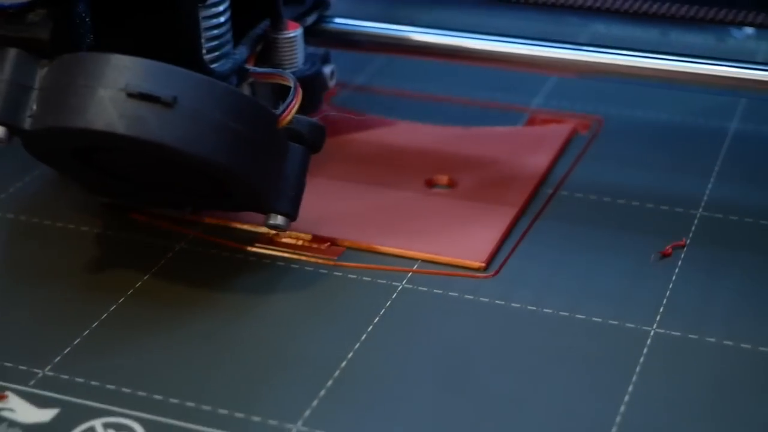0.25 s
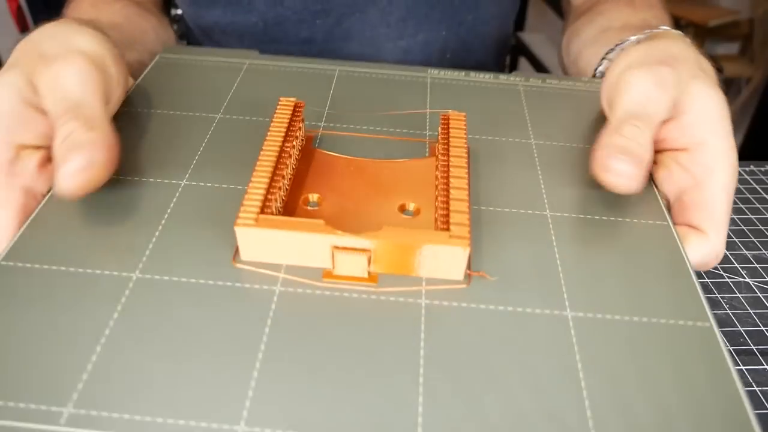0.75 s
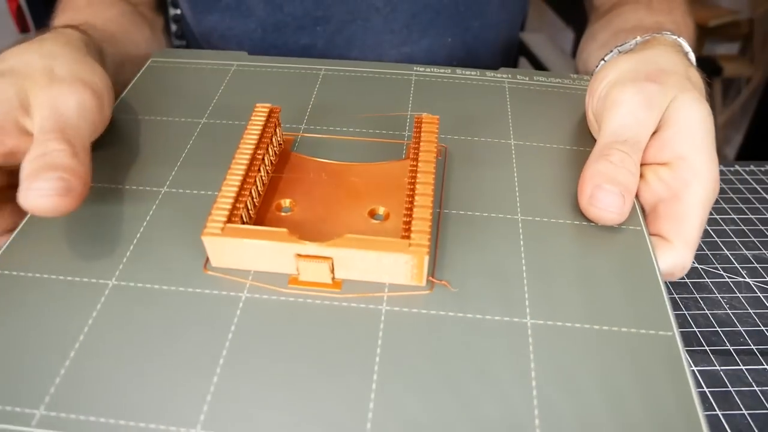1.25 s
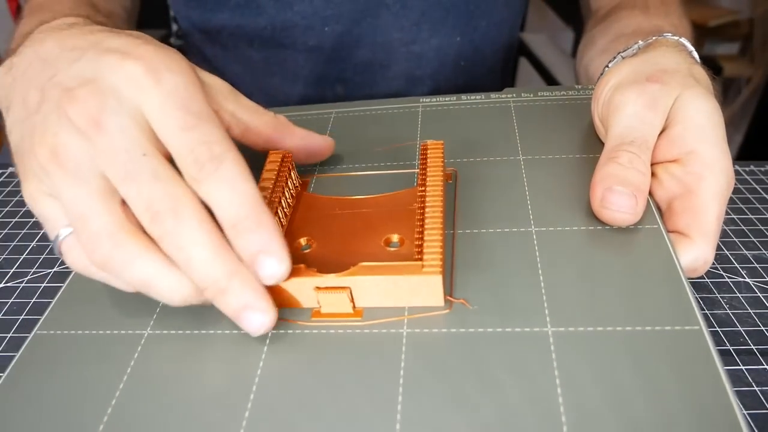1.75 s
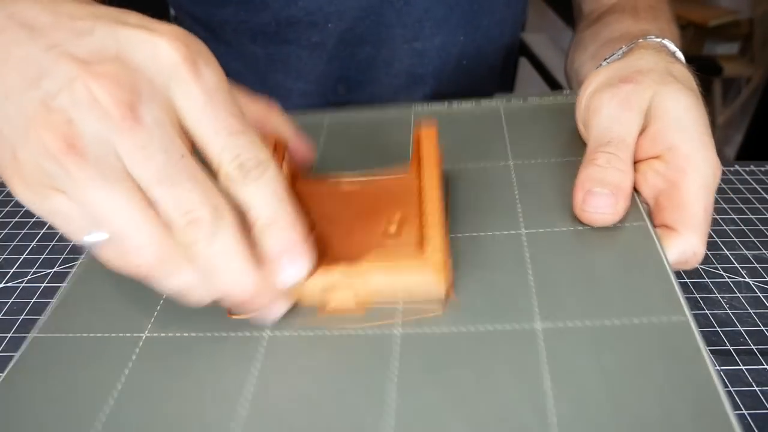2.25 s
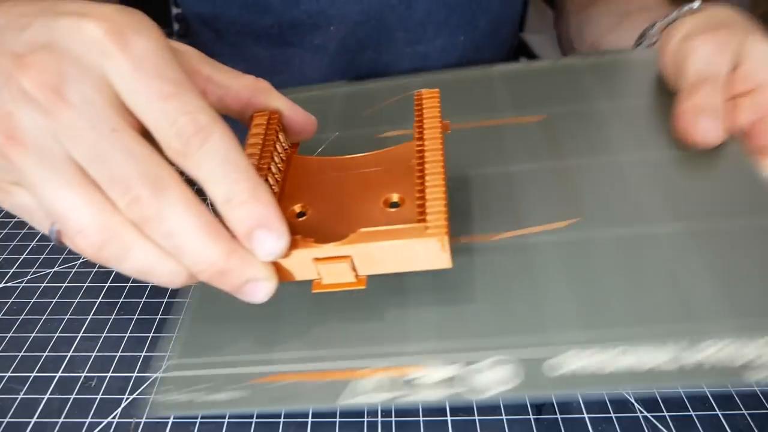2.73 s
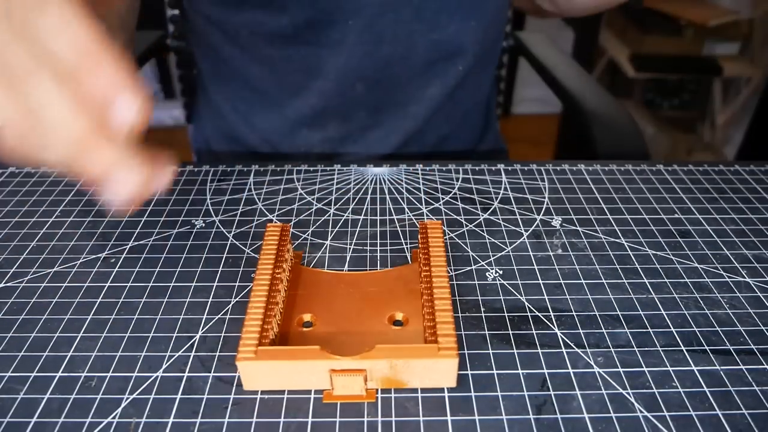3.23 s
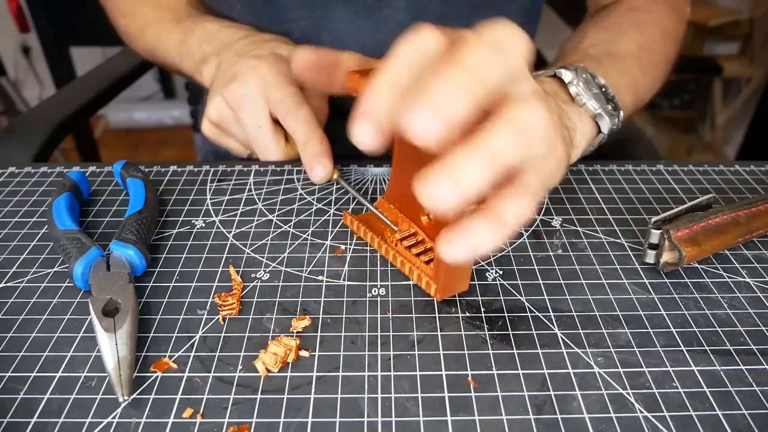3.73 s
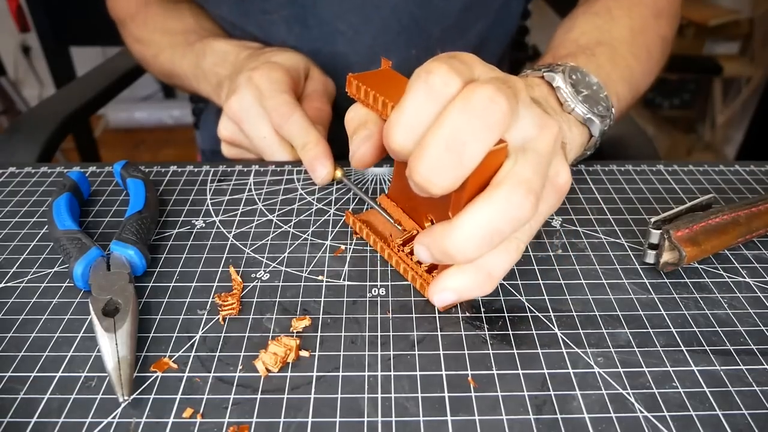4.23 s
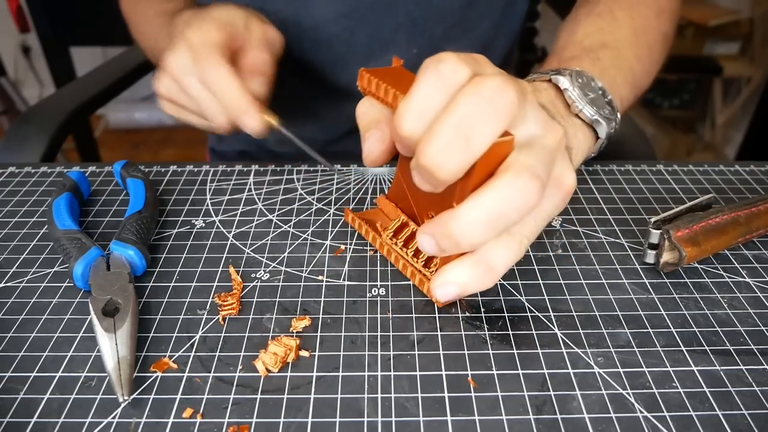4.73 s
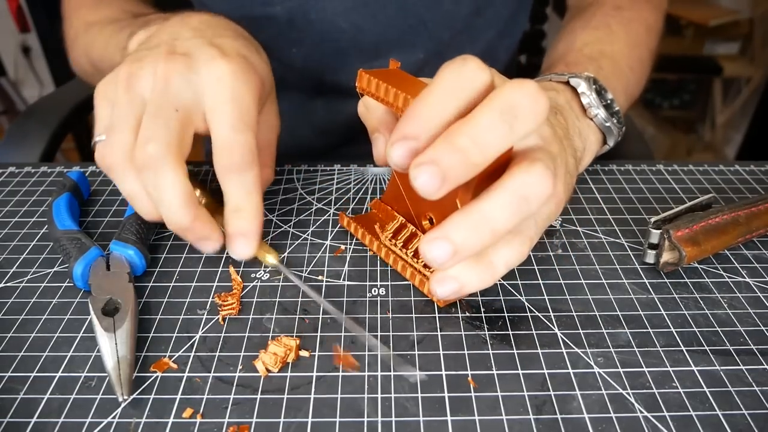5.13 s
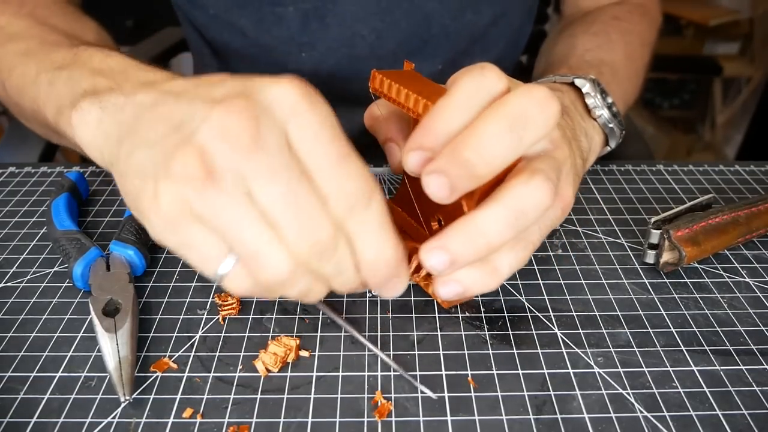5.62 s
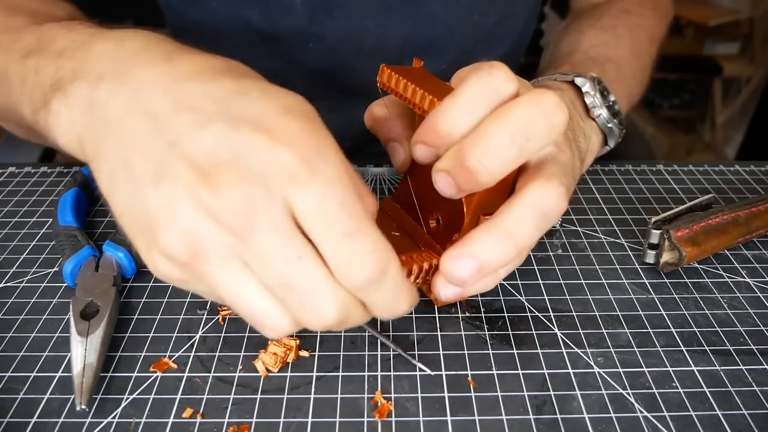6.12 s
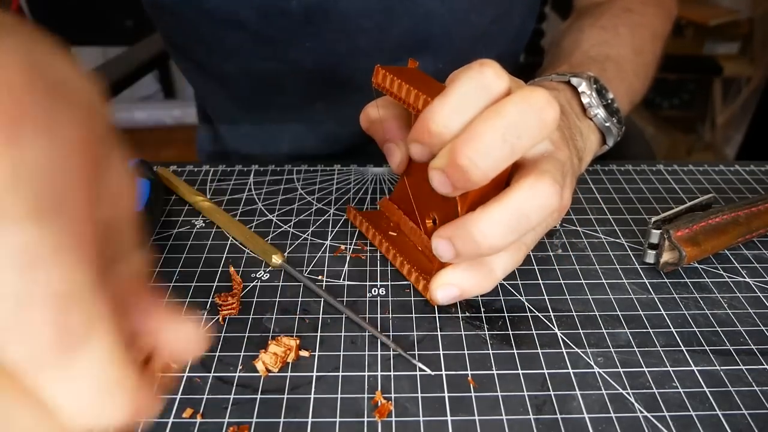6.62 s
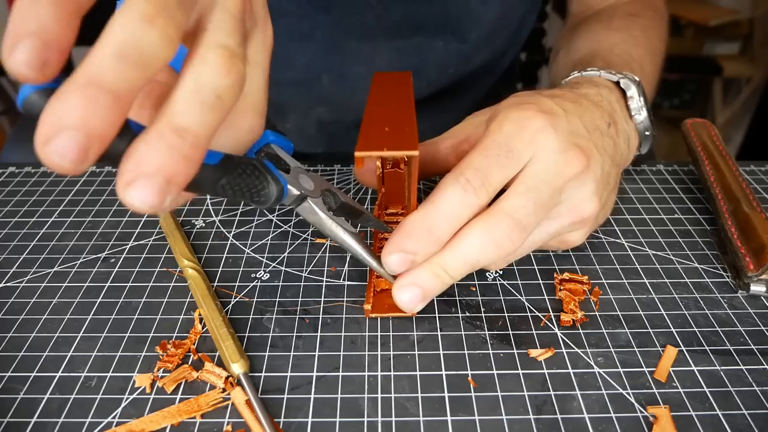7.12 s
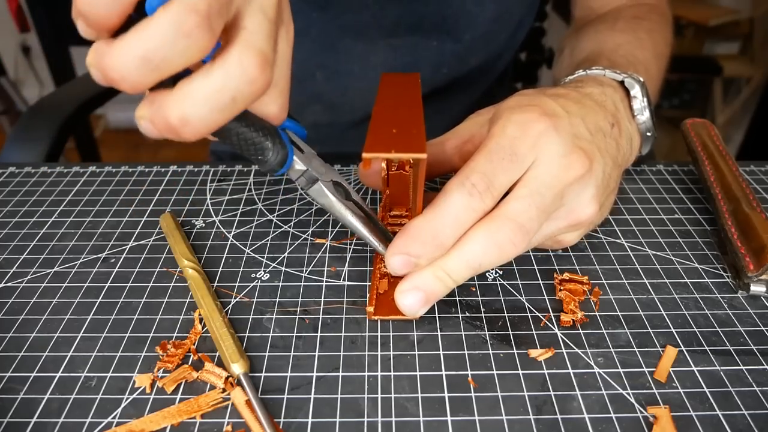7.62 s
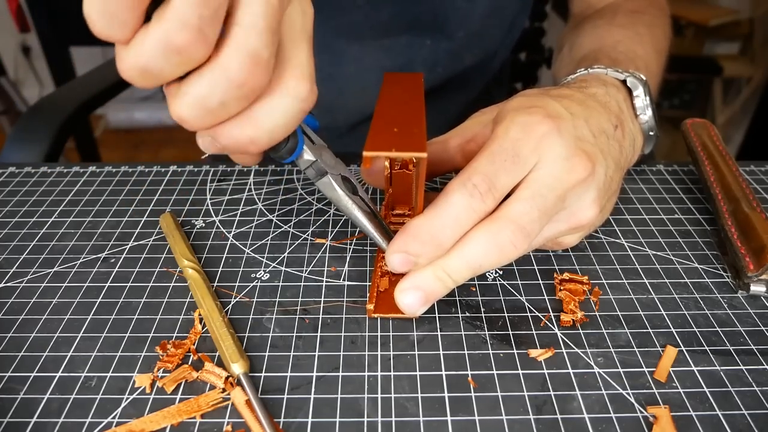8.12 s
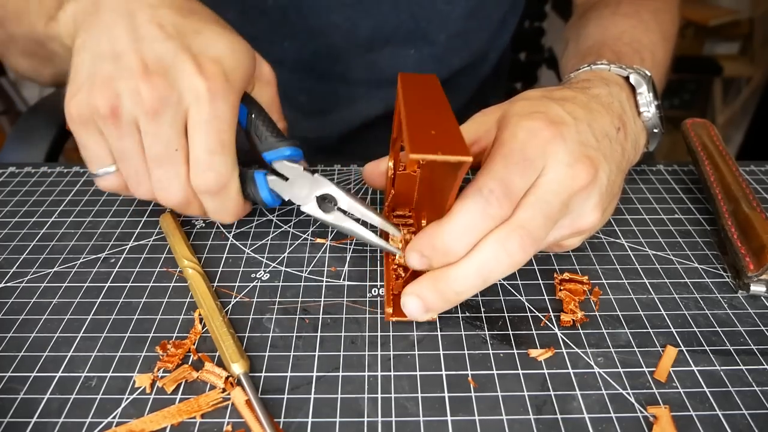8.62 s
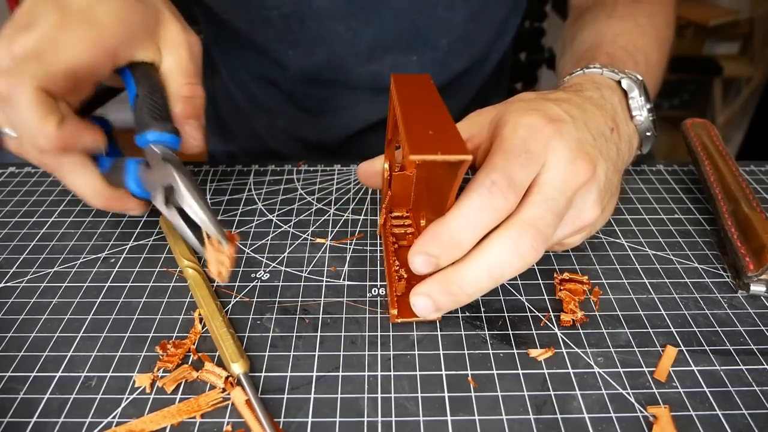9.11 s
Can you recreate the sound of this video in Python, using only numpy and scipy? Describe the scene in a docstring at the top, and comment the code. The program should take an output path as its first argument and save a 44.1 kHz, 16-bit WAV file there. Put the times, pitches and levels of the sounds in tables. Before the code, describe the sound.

A 3D printer's wavering motor tones and fan rush stop abruptly. In a small hard room, a plastic part cracks off a flexed steel sheet, the sheet swishes away and the part clacks onto a cutting mat. A thin pick snaps supports in bright clusters, a tool knocks loudly on the table, fingernails flick bits off, then pliers crunch and tear out more. One close microphone.

```python
"""A 3D printer hums for a moment. Then, at a work table in a small hard room, a plastic part cracks
loose from its flexed steel sheet and is set down. Its supports are broken out with a thin metal pick,
the fingers and pliers, heard by one microphone close by. Motors are wavering tones over fan noise;
cracks, snaps and knocks are short noise bursts ringing a body; rubbing is a swell of tiny slips."""
import sys
import numpy as np
from scipy import signal
from scipy.fft import rfft, irfft
from scipy.io import wavfile
from scipy.ndimage import uniform_filter1d

SR = 44100
rng = np.random.default_rng(int(sys.argv[2]) if len(sys.argv) > 2 else 0)


def store_wav(level_fs):
    """Save 16-bit WAV to argv[1]."""
    pcm = np.round(np.clip(np.atleast_2d(level_fs), -1, 1) * 32767)
    wavfile.write(sys.argv[1], SR, pcm.T.astype(np.int16))


N = 412776  # length of the scene in samples
TAPS = 8192  # length of one short sound in samples
PRINTER_END = .393  # seconds


def amp(db):
    """Turns decibels into a plain factor."""
    return 10 ** (np.asarray(db) / 20)


def evened(x):
    """Brings a sound to an rms of 1."""
    return x / np.sqrt(np.mean(x ** 2) + 1e-20)


def read(points, hz):
    """Reads a curve of (Hz, value) points, with pitch on a log scale."""
    f, value = np.transpose(points)
    return np.interp(np.log(hz + 1), np.log(f + 1), value)


def add(mix, s, sound):
    """Adds a sound to the mix, starting at s seconds."""
    part = mix[max(round(s * SR), 0):][:len(sound)]
    part += sound[:len(part)]


def bins(size):
    """The frequencies in Hz of a spectrum."""
    return np.fft.rfftfreq(size, 1 / SR)


def coloured(x, colour):
    """Filters a sound by a (Hz, dB) curve and brings it to rms 1."""
    return evened(irfft(rfft(x) * amp(read(colour, bins(len(x)))), len(x)))


def drift(edge_hz):
    """A random curve of rms 1 that moves little faster than edge_hz."""
    noise = rfft(rng.standard_normal(N))
    return evened(irfft(noise * np.exp(-(bins(N) / edge_hz) ** 2), N))


def causal(gain):
    """The spectrum of a response with this gain that starts at once and then rings out."""
    log_gain = np.log(np.maximum(gain, 1e-5))
    circle = np.concatenate([log_gain, log_gain[-2:0:-1]])
    return np.exp(np.conj(signal.hilbert(circle)))[:len(gain)]


def below(hz, edge_hz):
    """A soft step: near 1 under the edge, near 0 over it."""
    return 1 / (1 + (hz / edge_hz) ** 6)


def peak(hz, centre_hz, width_hz, db):
    """The gain that one resonance adds."""
    return (amp(db) - 1) / (1 + (2 * (hz - centre_hz) / width_hz) ** 2)


def glide(hz):
    """A sine that follows a pitch curve in Hz."""
    return np.sin(2 * np.pi * np.cumsum(hz) / SR)


# The printer's motor tones. Each row: pitch in Hz, level in dB.
MOTOR_TONES = [(177.6, -61.5), (213, -65), (240, -63), (291, -72), (350, -62), (507, -61.5), (524, -58),
               (2912, -71)]
# The rush of its fans. Each row: pitch in Hz, strength in dB.
FAN_COLOUR = [(60, -21), (130, -13.5), (240, -13), (330, -19), (420, -14), (520, -5), (680, -13),
              (1100, -11.5), (1500, -23), (2600, -16.5), (4500, -23.5), (10000, -39), (16000, -60)]
# The high sizzle of the motor drivers. Each row: time in seconds, centre in Hz, level in dB.
SIZZLE = [(0, 13300, -56), (.22, 13400, -57), (.26, 14600, -56), (.3, 16300, -64), (.36, 16300, -69),
          (.39, 15200, -60)]


def printer(fan_db=-54, flat_noise_db=-62, waver=0.0076, throb_db=3.5, sizzle_width_hz=2200):
    """Stepper tones waver over fan noise, with a band of driver sizzle whose centre moves."""
    t = np.arange(N) / SR
    hum = np.zeros(N)
    for hz, db in MOTOR_TONES:
        throb = amp(db + throb_db * drift(8.2))
        hum += throb * evened(glide(hz * (1 + waver * drift(26))))
    s, centre_hz, level_db = np.transpose(SIZZLE)
    turn = 2 * np.pi * np.cumsum(np.interp(t, s, centre_hz)) / SR
    # slow noise on a sine and a cosine makes a band of noise around the centre
    sizzle = evened(drift(sizzle_width_hz) * np.cos(turn) + drift(sizzle_width_hz) * np.sin(turn))
    sizzle *= amp(np.interp(t, s, level_db))
    fans = amp(fan_db) * coloured(rng.standard_normal(N), FAN_COLOUR)
    fans += amp(flat_noise_db) * rng.standard_normal(N)
    return (hum + sizzle + fans) * (t < PRINTER_END)


# The colour of the room's low background noise. Each row: pitch in Hz, strength in dB.
FLOOR_COLOUR = [(15, -47.5), (25, -20), (127, 2), (285, -6), (394, -4), (476, -9.5), (624, -10),
                (1370, -14.5), (2610, -23.5), (4740, -21), (8360, -26.5), (14800, -38), (16000, -37.5)]
# Its loudness over time. Each row: time in seconds, level in dB.
FLOOR_LEVEL = [(0, -63.5), (3.402, -67.5), (3.6, -56), (6.698, -64), (7.599, -62), (9.302, -63.5)]


def floor():
    """The room's background: coloured noise that swells by over 10 dB near 3.5 s, then sinks."""
    s, db = np.transpose(FLOOR_LEVEL)
    level = amp(np.interp(np.arange(N) / SR, s, db))
    return level * coloured(rng.standard_normal(N), FLOOR_COLOUR)


# One motor slows down as the head ends a stroke. Each row: time in seconds, pitch in Hz, level in dB.
MOTOR_SLOWING = [(.22, 305, -82), (.27, 289.4, -47), (.31, 242.4, -56), (.36, 223.4, -61),
                 (.39, 225, -43.5)]


def slowing_motor():
    """A stepper tone that sinks with the speed of the head."""
    t = np.arange(N) / SR
    s, hz, db = np.transpose(MOTOR_SLOWING)
    tone = evened(glide(np.interp(t, s, hz)))
    return tone * amp(np.interp(t, s, db)) * (t > s[0]) * (t < PRINTER_END)


def blows(rows, colour, modes, db, length_s, strut_db, wet_db, scatter_db=-17,
          strut_width_hz=1100, bounce=0.46):
    """Runs of tiny fractures or contacts ring a body; returns the near sound and what fills the room."""
    near, far, hz, t = np.zeros(N), np.zeros(N), bins(TAPS), np.arange(TAPS) / SR
    ringing = 1 + sum(peak(hz, *mode) for mode in modes)
    small = np.sqrt(1 - below(hz, 130))  # small bodies radiate little bass
    body = amp(read(colour, hz)) * ringing * small
    # the break builds and dies within a few ms; hands and table scatter it a little longer
    envelope = t / length_s * np.exp(1 - t / length_s) + amp(scatter_db) * np.exp(-t / .008)
    fade = np.cos(np.pi / 2 * t / t[-1]) ** 2
    for s, level_db, body_db, sheen_db, strut_hz in rows:
        run = rfft(rng.standard_normal(TAPS) * envelope)
        even = 1 / np.sqrt(uniform_filter1d(abs(run) ** 2, size=90))  # a break excites all pitches about alike
        tilt = amp(body_db * below(hz, 2500) - sheen_db * below(hz, 8100))
        blow = run * causal(even * body * tilt)
        # up close the struck spot rings out, and one bounce off the mat combs the treble
        strut = causal(1.5 + peak(hz, strut_hz, strut_width_hz, strut_db))
        delay_s = rng.uniform(.0004, .0012)
        comb = 1 + bounce * (1 - below(hz, 1200)) * np.exp(-2j * np.pi * hz * delay_s)
        sound = irfft(blow * strut * comb) * fade  # what reaches the microphone first
        # equal energy for equal level, as if spread over 5 ms
        gain = amp(level_db + db) / np.linalg.norm(sound) * np.sqrt(SR / 200)
        add(near, s, gain * sound)
        add(far, s, gain * amp(wet_db) * irfft(blow) * fade)
    return np.array([near, far])


# Levels in the tables of blows, pushes and strokes are relative: db in the function shifts them all.
# Fingers bumping the steel sheet. Each row: start in seconds, level in dB, body under 2.5 kHz in dB.
BUMPS = [(.447, -50, 20), (.6467, -56.5, 22), (1.1413, -55, 20.5), (1.2971, -56, 4), (1.4131, -49, 3),
         (1.5911, -47, 18)]
# The part cracking loose from the flexed sheet. Each row: start in seconds, level in dB,
# body under 2.5 kHz in dB, pitch in Hz at which the struck spot rings.
PEELS = [(0.5067, -51, -14, 7100), (0.887, -31, -1.5, 10780), (0.8886, -28, 8.5, 10830),
         (0.8959, -21, -8.5, 5900), (0.995, -43.5, -22, 6090), (2.2172, -39.5, -13.5, 8270),
         (2.2342, -22.5, -5, 3730), (2.2587, -31, -6.5, 8380), (2.273, -22, -4, 8150),
         (2.2793, -17.5, 2, 5500), (2.3067, -18.5, 14, 3060)]
# The colour of both. Each row: pitch in Hz, strength in dB.
PEEL_COLOUR = [(100, -4.5), (350, -10.5), (650, 9), (1300, 2.5), (2600, -5), (5500, -0.5), (8000, -3),
               (11000, -7.5), (16000, -25.5)]
# What rings in the sheet. Each row: pitch in Hz, width in Hz, boost above the colour in dB.
SHEET_MODES = [(624, 47, 6.5), (774, 11, 5.5), (966, 30, 5), (1234, 30, 5.5), (1630, 120, -3),
               (3600, 99, 3.5)]


def bumps_and_peels(peel_sheen_db=3.5, bump_sheen_db=-15.5, bump_ring_hz=3940):
    """Bumping fingers and the cracking part both ring the steel; sheen sets the range over 8.1 kHz."""
    rows = [(s, level_db, body_db, peel_sheen_db, ring_hz) for s, level_db, body_db, ring_hz in PEELS]
    rows += [(*bump, bump_sheen_db, bump_ring_hz) for bump in BUMPS]
    return blows(rows, PEEL_COLOUR, SHEET_MODES, db=1.57, length_s=0.00081, strut_db=12.0, wet_db=8.0)


def recoils(hits, db, length_s=0.02):
    """A recoiling hand gives the table a dull push with each hit, in proportion to its strength."""
    return [(s, level_db + db, length_s) for s, level_db, *_ in hits]


# The hands pressing the part onto the table, or the part hitting it. Each row: start in seconds,
# level in dB, fading time in seconds.
THUMPS = [(2.312, -34.5, 0.031), (2.722, -53, 0.023), (3.514, -41, 0.0096), (3.706, -38.5, 0.01),
          (3.825, -43.5, .033), (4.396, -42, 0.071), (4.796, -60, .018), (4.97, -51, 0.031),
          (5.701, -43, 0.012), (6.5, -43.5, 0.029), (7.006, -50, 0.04), (7.56, -42.5, 0.095),
          (8.612, -35.5, 0.022)]
# How the table top answers a push. Each row: pitch in Hz, strength in dB.
THUMP_COLOUR = [(25, -33.5), (52, -17.5), (75, -2.5), (105, -4), (138, 5), (185, -11.5), (225, -3),
                (400, -10), (900, -31.5), (3000, -72)]


def thumps(db=0.5):
    """Pushes, hits and recoils shake the table top: fading noise through its mostly low response."""
    out, t = np.zeros(N), np.arange(TAPS) / SR
    pushes = THUMPS + recoils(BUMPS, db=-9) + recoils(LANDINGS, db=-23) + recoils(PULLS, db=-32)
    top = causal(amp(read(THUMP_COLOUR, bins(TAPS))))
    for s, level_db, length in pushes:
        push = irfft(rfft(rng.standard_normal(TAPS) * np.exp(-t / length)) * top)
        push *= signal.windows.tukey(TAPS, .02)
        add(out, s, amp(level_db + db) * push / np.linalg.norm(push) * np.sqrt(length * SR / 2))
    return out


# Faint thin whistles, one curve each. Each row of a curve: time in seconds, pitch in Hz, level in dB.
WHISTLES = [
    [(1.42, 8600, -82), (1.54, 10500, -77), (1.61, 11200, -74), (1.68, 9300, -82), (1.78, 8350, -74),
     (1.9, 8500, -75), (2.0, 7500, -77)],
    [(1.49, 7650, -70), (1.53, 8300, -64), (1.56, 8200, -70), (1.6, 8700, -67)],
    [(7.71, 6400, -62), (7.81, 6050, -58), (7.89, 6400, -56), (7.98, 5850, -66)],
]


def whistles(waver=0.0046):
    """Faint thin tones that glide and waver."""
    out, t = np.zeros(N), np.arange(N) / SR
    for curve in WHISTLES:
        s, hz, db = np.transpose(curve)
        on = (t > s[0]) & (t < s[-1])
        pitch = np.interp(t[on], s, hz) * (1 + waver * drift(200)[on])
        tone = amp(np.interp(t[on], s, db)) * glide(pitch)
        add(out, s[0], tone * signal.windows.tukey(on.sum(), .2))
    return out


def drags(snaps, delay_s=.014, half_s=.013, db=-23, body_db=-8.5):
    """After each snap the broken edge drags past its stump in a short stroke."""
    return [(s + delay_s, half_s, level_db + db, body_db) for s, level_db, _ in snaps]


# Strokes of plastic dragging over plastic or steel. Each row: time of the peak in seconds,
# half length in seconds, level in dB, body in dB (here under 1.3 kHz).
SCRAPES = [(1.431, 0.014, -55, 35.5), (1.617, 0.037, -67.5, 20), (1.765, .04, -64, 8), (3.721, .13, -58, 0),
           (4.654, .015, -43.5, 3.5), (4.724, .0087, -36.5, -24.5), (4.801, 0.0031, -44.5, 25.5),
           (4.989, .07, -56, 10), (5.596, 0.13, -59.5, 0), (5.924, 0.07, -56.5, 6.5),
           (6.411, 0.042, -58.5, -9.5), (7.798, .19, -65.5, -6), (8.418, .11, -44, -11),
           (8.555, 0.059, -36, -8), (8.837, .025, -56.5, -3), (8.967, 0.022, -43, -3),
           (9.19, 0.17, -68.5, -15)]
# Their colour. Each row: pitch in Hz, strength in dB.
SCRAPE_COLOUR = [(100, -7), (400, 8.5), (750, 5.5), (1600, -7.5), (2700, -12.5), (4800, -8.5), (7500, -5.5),
                 (11000, -11), (16000, -21)]


def scrapes(slips_per_s=2600, spread_db=-1.5, hiss=1.0, db=4.0):
    """A stroke is a swell of small uneven slips over smooth hiss."""
    out, size = np.zeros(N), SR // 2
    t, hz = np.arange(size) / SR - 1 / 4, bins(size)  # the peak lies at t = 0
    for s, half, level_db, body_db in SCRAPES + drags(PICKS + PULLS):
        strength = amp(spread_db * np.minimum(rng.exponential(1, size), 4))
        slips = strength * (rng.random(size) < slips_per_s / SR)
        rub = (evened(slips) + hiss) * rng.standard_normal(size)
        colour = amp(read(SCRAPE_COLOUR, hz) + body_db * below(hz, 1300))
        rub = evened(irfft(rfft(rub) * colour, size))
        add(out, s + t[0], amp(level_db + db) * rub * np.exp(-(t / half) ** 2))
    return out


def swish(s=2.695, half_s=0.065, db=-50.5):
    """The steel sheet slides away over the mat: a smooth swell with a low body and a singing edge."""
    colour = [(100, -18), (700, 4.5), (1600, -2.0), (2700, -9.5), (4500, -4.5), (6500, -10.0),
              (10000, -21), (16000, -40)]  # (Hz, dB)
    swell = np.exp(-((np.arange(N) / SR - s) / half_s) ** 2)
    return amp(db) * coloured(rng.standard_normal(N), colour) * swell


# The part landing on the cutting mat. Each row: start in seconds, level in dB,
# body under 2.5 kHz in dB, sheen over 8.1 kHz in dB, ring in Hz.
LANDINGS = [(3.1425, -15, -4, -1, 5490), (3.1877, -25, 5, -30, 5530.0)]
# The landing's colour. Each row: pitch in Hz, strength in dB.
LANDING_COLOUR = [(100, -13), (380, -15), (600, -9.5), (1500, -4), (2900, -9.5), (5300, -11), (7500, -15),
                  (9500, -16), (16000, -35.5)]
# What rings in the part. Each row: pitch in Hz, width in Hz, boost above the colour in dB.
PART_MODES = [(626, 73, 18), (1346, 110, 5.2), (2180, 84, 5), (3760, 79, 0.8), (5760, 240, 8.7)]


def landings():
    """The part strikes the mat and rings in its own modes."""
    return blows(LANDINGS, LANDING_COLOUR, PART_MODES, db=4.5, length_s=0.0014, scatter_db=-10.5,
                 strut_db=7.5, wet_db=7.5)


def splintered(snaps, body_db, sheen_db, body_per_db, sheen_per_db, count=2,
               firm_db=-24, gap_s=.011, splinter_db=-11, spread_db=4.5):
    """Splinters follow each snap, usually weaker; the force of the snap sets the colour of them all."""
    rows = []
    for (s, level_db, ring_hz), chance in zip(snaps, rng.standard_normal((len(snaps), count, 2))):
        force_db = level_db - firm_db  # against an ordinary snap
        colour = (body_db + body_per_db * force_db, sheen_db + sheen_per_db * force_db, ring_hz)
        rows.append((s, level_db, *colour))
        for late, strong in chance:
            s += gap_s * np.exp(.5 * late)
            level_db += splinter_db
            rows.append((s, level_db + spread_db * strong, *colour))
    return rows


# Thin supports snapping under the pick. Each row: start in seconds, level in dB, ring of the strut in Hz.
PICKS = [(3.5787, -31, 5540), (3.9021, -29, 3700), (3.9611, -18.5, 9300), (3.9817, -23.5, 8700),
         (4.0501, -19.5, 5170), (4.0961, -22.5, 8870), (4.1072, -18, 9830), (4.1126, -15, 8380),
         (4.1227, -22, 8940), (4.1709, -21, 9200), (4.1851, -15, 8800), (4.1978, -25, 8980),
         (4.316, -21, 5460), (4.3307, -18.5, 9000), (4.3912, -14, 8550), (4.3984, -11, 5530),
         (4.4102, -17, 5080), (4.6079, -26, 4140), (4.7258, -30.5, 4370), (5.4032, -34.5, 5210),
         (5.4482, -38.5, 5700), (5.6504, -32.5, 6140)]
# Their colour. Each row: pitch in Hz, strength in dB.
PICK_COLOUR = [(100, -13), (350, -4.5), (700, 2.5), (1400, 2), (2500, -8), (4200, -5.5), (7200, -5.5),
               (9300, -2.5), (11000, -9.5), (13000, -8.5), (16000, -22.5)]
# What rings in the hand-held part, also under fingernails and pliers.
# Each row: pitch in Hz, width in Hz, boost above the colour in dB.
HELD_MODES = [(627, 140, 10.5), (937, 100, 12), (1303, 210, 5), (1920, 730, 4), (2400, 280, -2.5),
              (5054, 540, 2.5), (7790, 120, 3)]


def picks():
    """Thin supports snap under the pick and ring the held part."""
    rows = splintered(PICKS, body_db=-5.0, sheen_db=2.5, body_per_db=-0.16, sheen_per_db=0.15)
    return blows(rows, PICK_COLOUR, HELD_MODES, db=-0.35, length_s=0.00076, strut_db=12.5, wet_db=5.5)


# A lightly touched tool or loose strut rings on. Each row: start in seconds, pitch in Hz, level in dB,
# time in seconds to fall by 60 dB.
PINGS = [(3.638, 1320, -32, 0.045), (4.965, 924, -43.5, 0.35), (4.974, 960, -49, 0.15),
         (4.965, 2980, -46, 0.059), (5.906, 1273, -30, 0.039), (6.795, 3360, -48.5, 0.033)]


def pings():
    """Single modes that die away as plain sines."""
    out, t = np.zeros(N), np.arange(TAPS) / SR
    for s, hz, level_db, t60 in PINGS:
        add(out, s, amp(level_db - 60 * t / t60) * np.sin(2 * np.pi * hz * t))
    return out


# Tools, knuckles and the held part knocking on the table. Each row: start in seconds, level in dB,
# body under 2.5 kHz in dB, sheen over 8.1 kHz in dB, ring in Hz.
KNOCKS = [(3.7094, -37, 19, 9, 5360), (4.5037, -26, -.5, -22, 5020), (5.1502, -11.5, 4.5, -22.5, 3180),
          (5.1553, -6, 36, -6, 6270), (5.7129, -25, -0.5, 3.5, 6050), (5.9057, -36.5, 25, 3, 6600),
          (6.2977, -39, 0, -27, 6070.0), (6.9417, -34, 11.5, -4, 3090), (7.0257, -41.5, 2.5, 5, 6570)]
# Their colour. Each row: pitch in Hz, strength in dB.
KNOCK_COLOUR = [(100, -21.5), (300, -18), (580, -13.5), (1300, -11.5), (2400, -18), (5500, -19.5),
                (8500, -18), (16000, -29)]
# What rings in the table. Each row: pitch in Hz, width in Hz, boost above the colour in dB.
TABLE_MODES = [(470, 49, 4.8), (610, 32, 12.4), (870, 55, 11), (1308, 61, 4)]


def knocks():
    """Tools, knuckles and the held part strike the table and ring its modes."""
    return blows(KNOCKS, KNOCK_COLOUR, TABLE_MODES, db=-4.0, length_s=0.0018, scatter_db=-4.5,
                 strut_db=4.0, wet_db=4.0)


def crumbs(count=12, per_s=16, db=15.5, spread_db=3, ring_hz=5360):
    """Crumbs break off at random moments of each hard, bright stroke; dull rubs shed none."""
    rows = []
    chances = rng.uniform(-1, 1, (len(SCRAPES), count, 3))
    for (s, half, level_db, body_db), chance in zip(SCRAPES, chances):
        for luck, when, strong in chance:
            if body_db < 0 and abs(luck) < per_s * 2 * half / count:
                rows.append((s + half * when, level_db + db + spread_db * strong, body_db / 2, 0, ring_hz))
    return rows


# Loose supports flicked off with the fingernails. Each row: start in seconds, level in dB,
# ring of the strut in Hz.
FLICKS = [(6.106, -34.5, 5720), (6.1558, -40.5, 12140), (6.2092, -27.5, 7270), (6.3777, -34, 11300),
          (6.4731, -28, 10400), (6.5107, -22, 5940), (6.796, -39.5, 3490)]
# Their colour. Each row: pitch in Hz, strength in dB.
FLICK_COLOUR = [(300, -4), (700, -9), (1600, -1), (3000, -9), (4400, -14.5), (6500, -6.5), (9500, -7.5),
                (16000, -14)]


def flicks():
    """Fingernails flick off loose supports; harder flicks have more body and more sheen."""
    rows = splintered(FLICKS, body_db=-4.0, sheen_db=-3.5, body_per_db=1.16, sheen_per_db=0.8)
    return blows(rows, FLICK_COLOUR, HELD_MODES, db=-0.1, length_s=0.0014, strut_db=15.5, wet_db=4.0)


# Supports torn out by the pliers. Each row: start in seconds, level in dB, ring of the strut in Hz.
PULLS = [(7.2522, -31, 7600), (7.2838, -14.5, 7440), (7.2884, -18, 7700), (7.299, -12.5, 6760),
         (7.325, -10.5, 6960), (7.38, -22, 7000), (7.4352, -10, 7300), (7.444, -13.5, 7760),
         (7.4824, -12, 7400), (7.511, -20, 4820), (7.5305, -18.5, 10900), (7.5414, -17.5, 7000),
         (7.5608, -15, 8100), (8.041, -27, 6800), (8.059, -13, 6180), (8.0874, -19.5, 4800),
         (8.255, -26.5, 9600), (8.2742, -26.5, 9730), (8.3559, -17.5, 6300), (8.3937, -28.5, 6640),
         (8.4123, -21, 6500), (8.4554, -27, 4930), (8.476, -27, 5300), (8.5245, -23.5, 5400),
         (8.5504, -15.5, 5800), (8.5609, -24.5, 6150), (8.9382, -35, 9800), (9.1831, -45.5, 11300)]
# Their colour. Each row: pitch in Hz, strength in dB.
PULL_COLOUR = [(100, -13.5), (300, -5.5), (800, -15), (1450, 2.5), (2700, -12.5), (4800, -4.5), (7300, -1),
               (9200, -10.5), (11000, -5.5), (16000, -20.5)]


def pulls():
    """Pliers tear out supports; the crumbs of the strokes share this colour."""
    rows = splintered(PULLS, body_db=-1.65, sheen_db=4.0, body_per_db=-0.28, sheen_per_db=-0.37)
    return blows(rows + crumbs(), PULL_COLOUR, HELD_MODES, db=-0.75, length_s=0.0011,
                 strut_db=12.5, wet_db=4.0)


# The room. Each row: pitch in Hz, time in seconds to fall by 60 dB, echo level in dB.
ROOM = [(100, 0.18, 0), (308, 0.37, -3.5), (700, 0.29, -4), (1810, 0.34, -6), (5000, 0.34, -5),
        (9050, 0.31, -7.5), (15000, 0.19, -9.5)]


def room(x, count=2500, first_s=0.00077, build_s=0.0037):
    """Sparse echoes of random sign, each band dying at its own speed."""
    taps = np.zeros(SR)
    taps[rng.integers(0, SR, count)] = rng.standard_normal(count)
    taps *= 1 - np.exp(-np.maximum(np.arange(SR) / SR - first_s, 0) / build_s)
    hz, t, z = signal.stft(taps, SR, nperseg=256)
    table = np.array(ROOM)
    decay = amp(-60 * t / read(table[:, :2], hz)[:, None])
    tail = rfft(signal.istft(z * decay, SR, nperseg=256)[1][:SR])
    # level out the spectrum, then give each band its echo level
    tail *= amp(read(table[:, ::2], bins(SR))) / np.sqrt(uniform_filter1d(abs(tail) ** 2, size=250))
    return signal.fftconvolve(x, irfft(tail)[:SR * 3 // 4])[:N]


def side_difference(x):
    """A faint phase difference between left and right, strongest in the high treble."""
    curve = [(100, -31.5), (500, -34), (2000, -37.5), (13000, -25)]  # (Hz, dB)
    return irfft(1j * rfft(x) * amp(read(curve, bins(N))), N)


def scene(hiss_db=-73.5):
    """Printer, handwork and room; the microphone hears nearly the same on both sides."""
    near, far = bumps_and_peels() + landings() + picks() + knocks() + flicks() + pulls()
    rubbing = scrapes() + swish() + thumps() + pings()
    handwork = near + rubbing + room(far + rubbing)
    mid = printer() + floor() + slowing_motor() + handwork + whistles()
    side = side_difference(mid)
    hiss = amp(hiss_db) * rng.standard_normal((2, N))  # the recorder's own, unrelated in left and right
    return np.array([mid + side, mid - side]) + hiss


def record(dry, edge_hz=16150):
    """Anything beyond full scale is cut flat; then a low-pass limits the band."""
    low_pass = signal.firwin(301, edge_hz, window=("kaiser", 8), fs=SR)
    return signal.oaconvolve(np.clip(dry, -1, 1), low_pass[None], "same")


dry = scene()
out = record(dry)
store_wav(out)
```